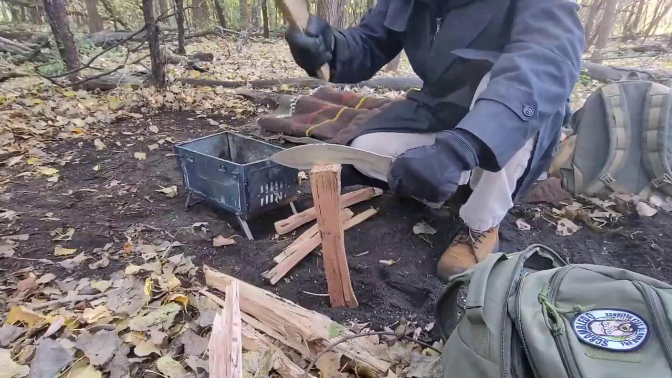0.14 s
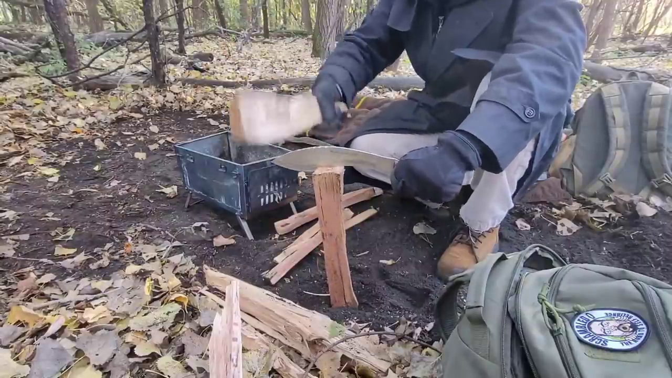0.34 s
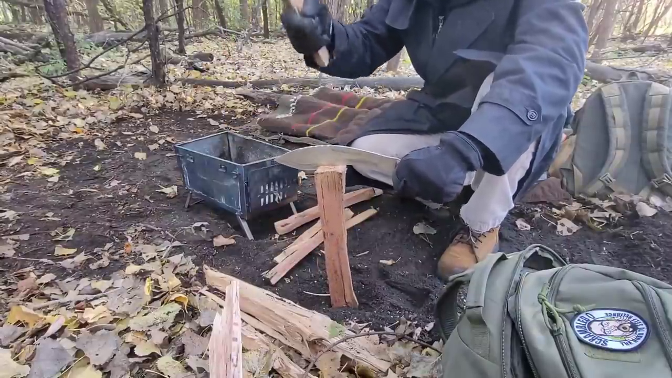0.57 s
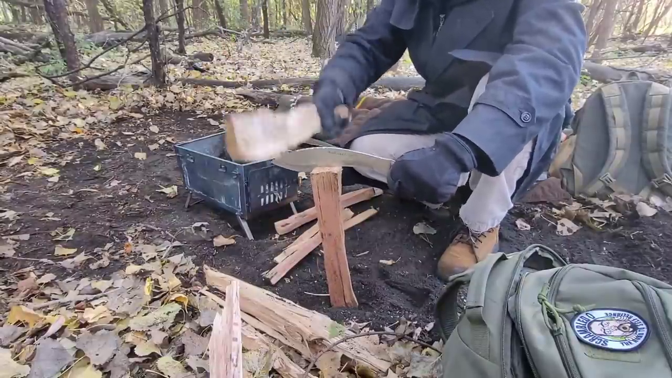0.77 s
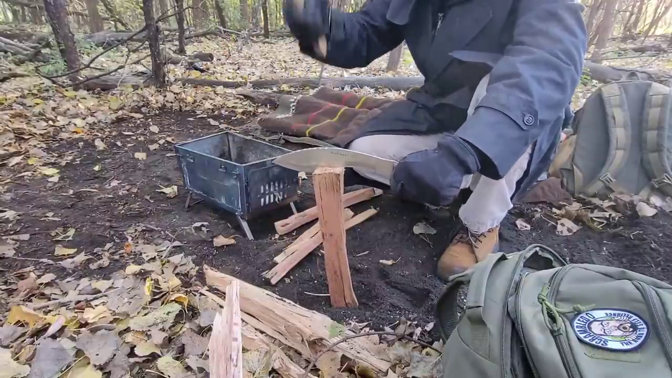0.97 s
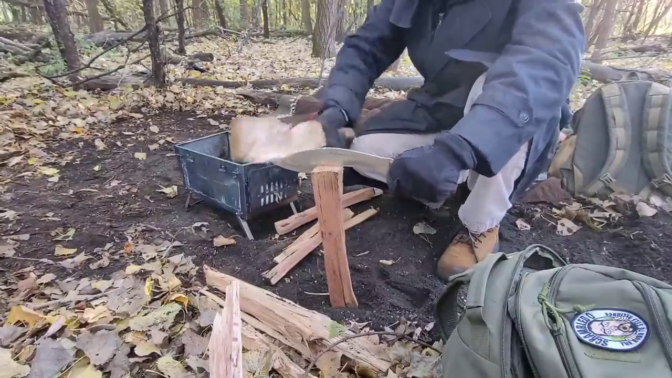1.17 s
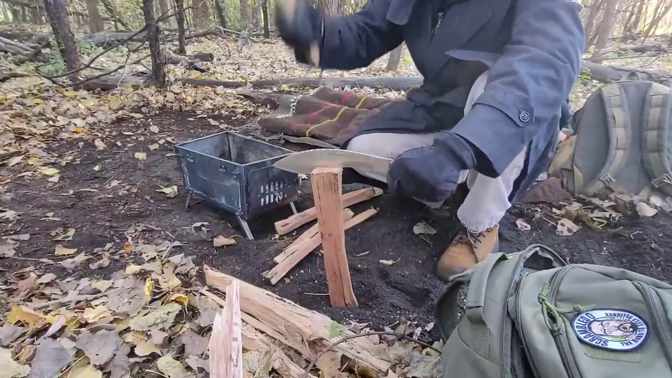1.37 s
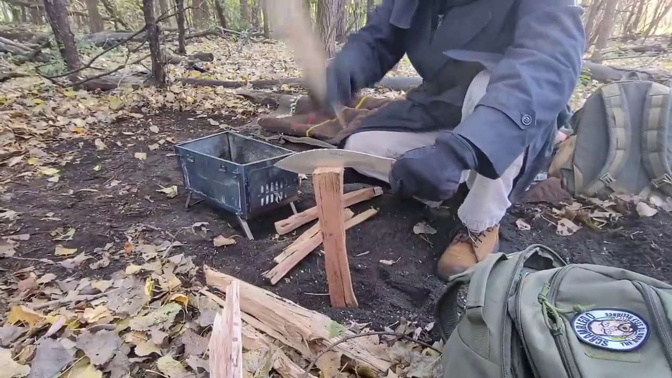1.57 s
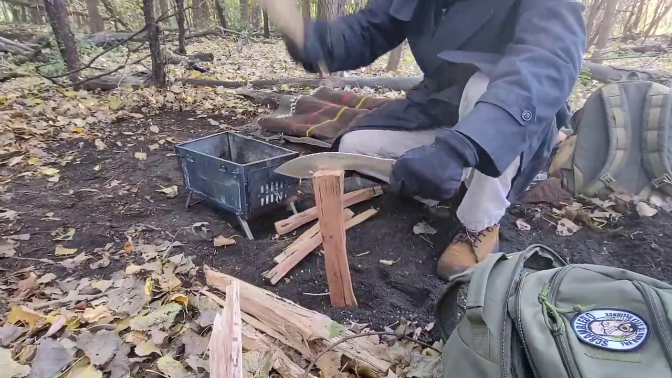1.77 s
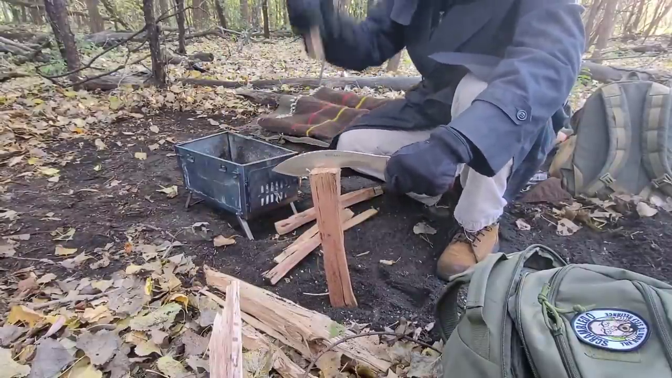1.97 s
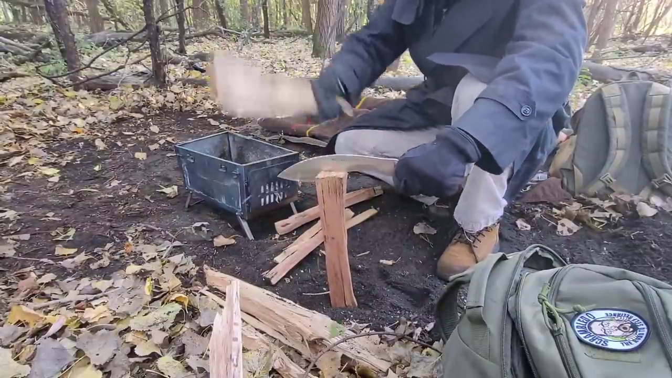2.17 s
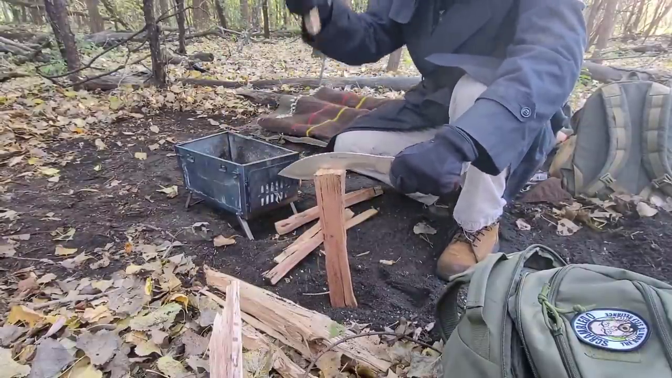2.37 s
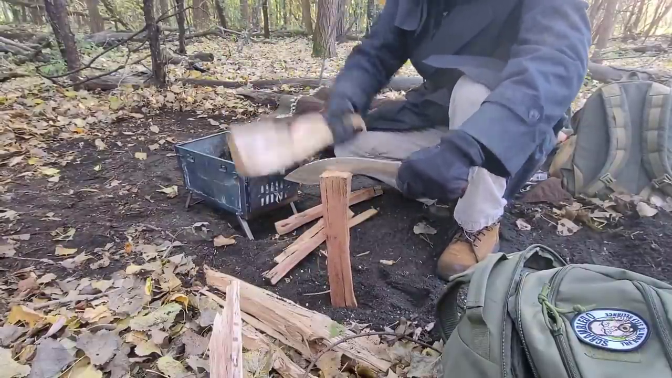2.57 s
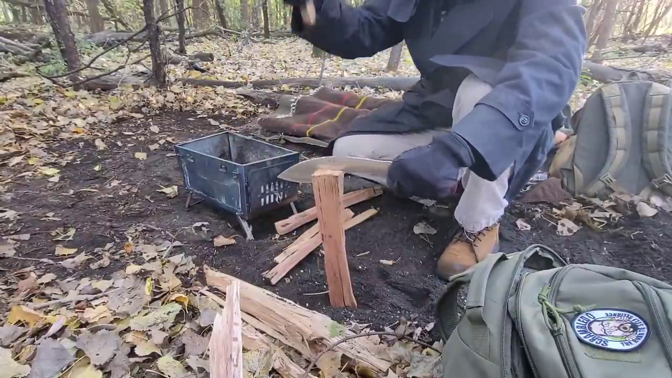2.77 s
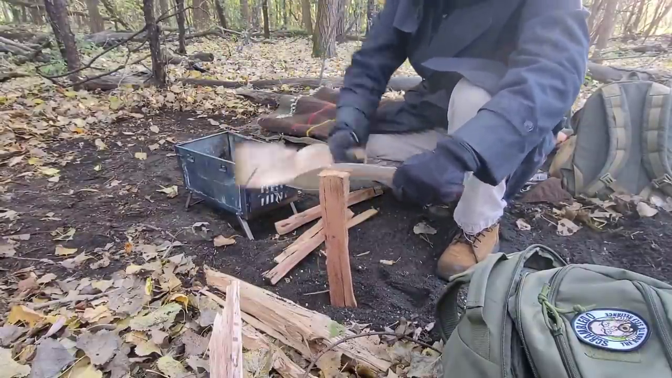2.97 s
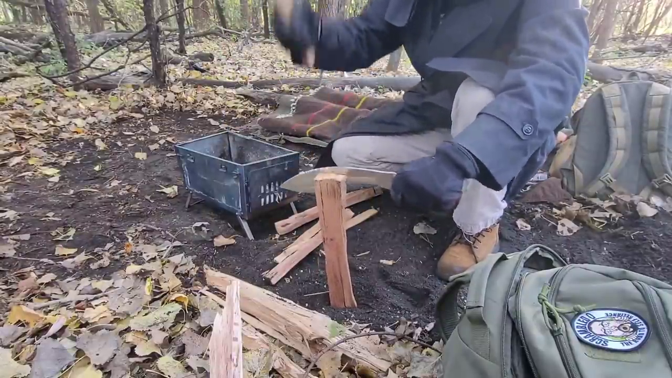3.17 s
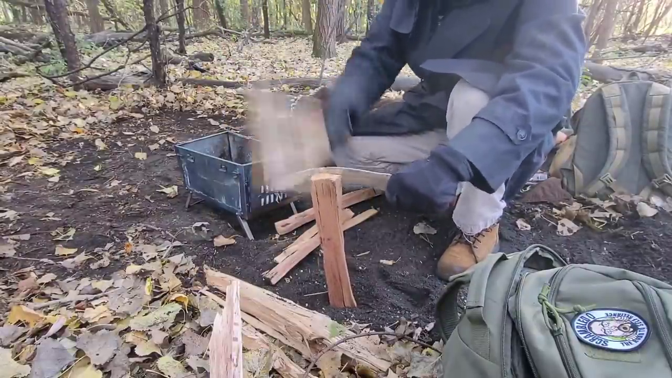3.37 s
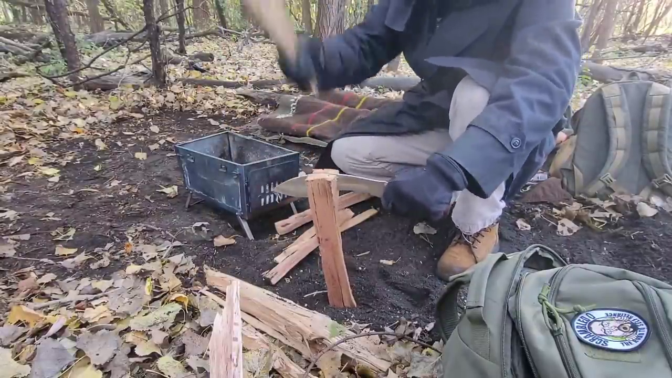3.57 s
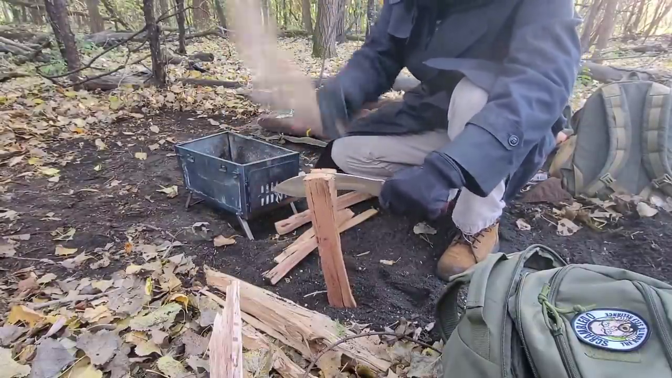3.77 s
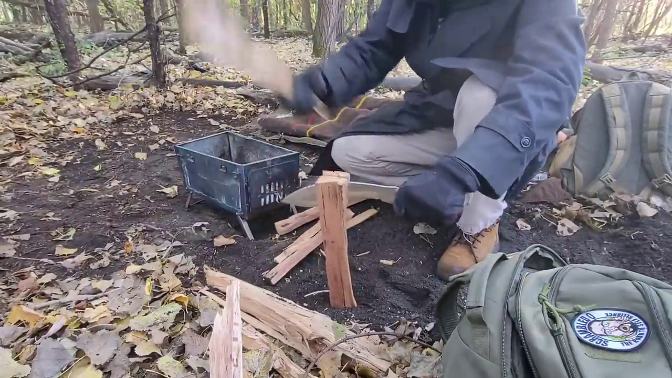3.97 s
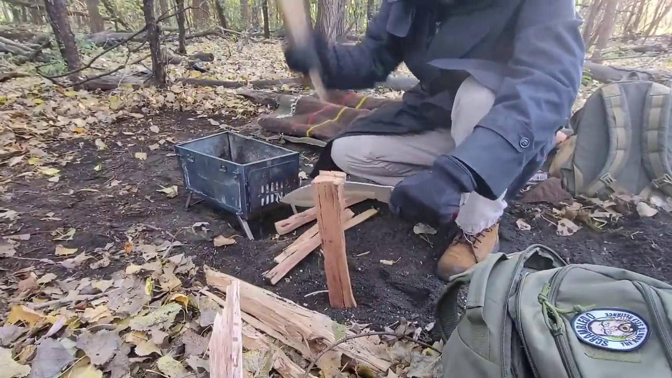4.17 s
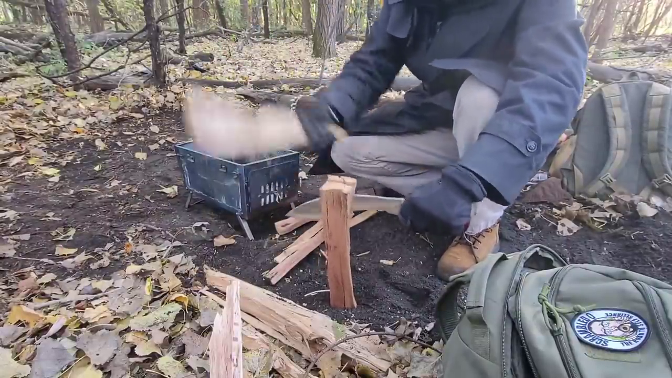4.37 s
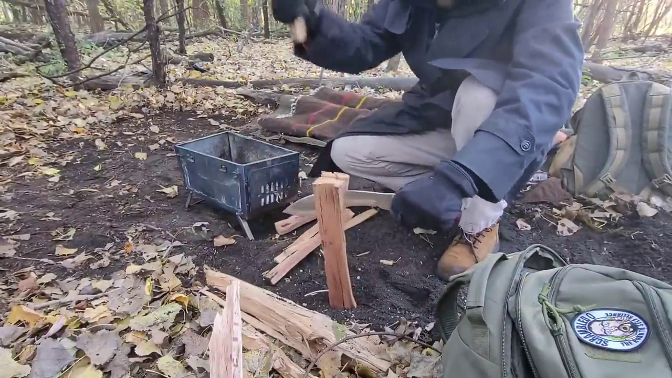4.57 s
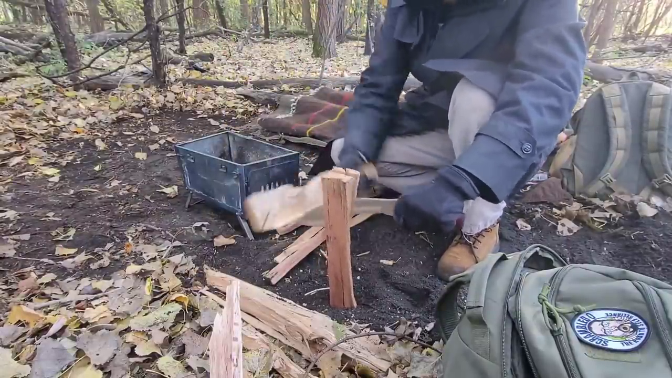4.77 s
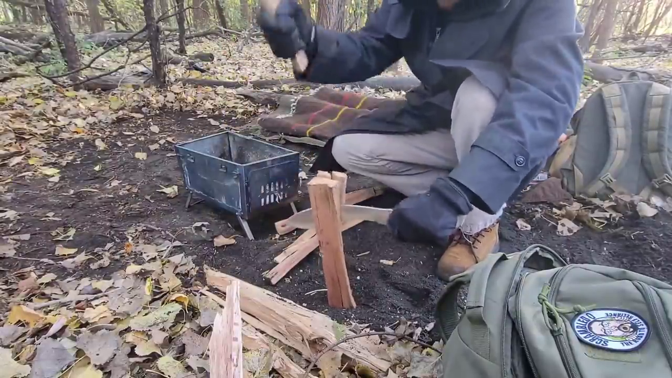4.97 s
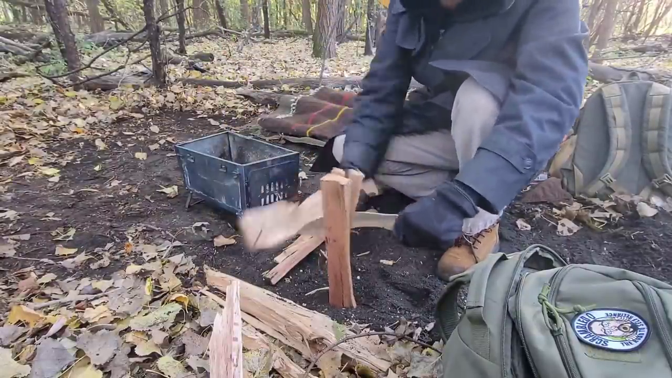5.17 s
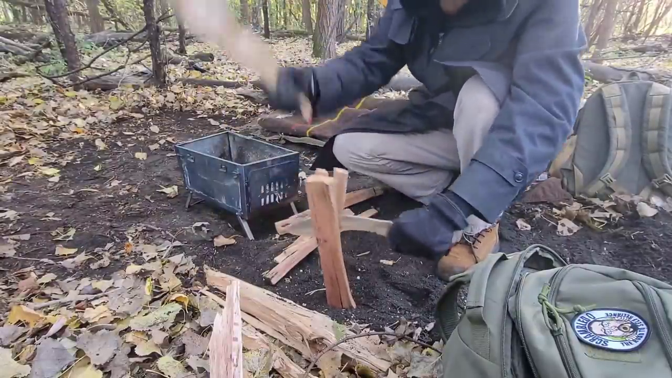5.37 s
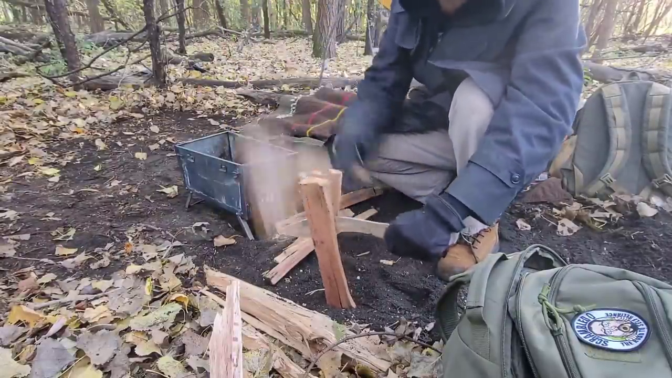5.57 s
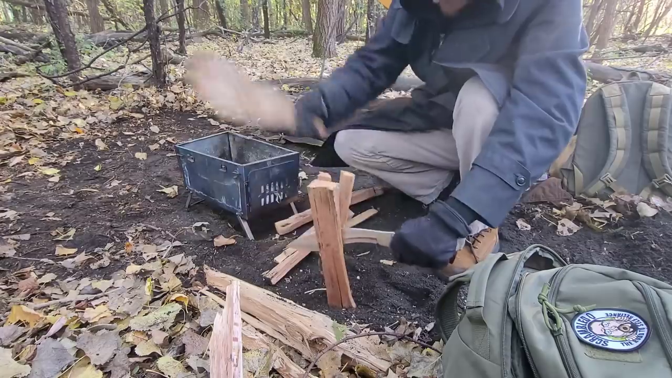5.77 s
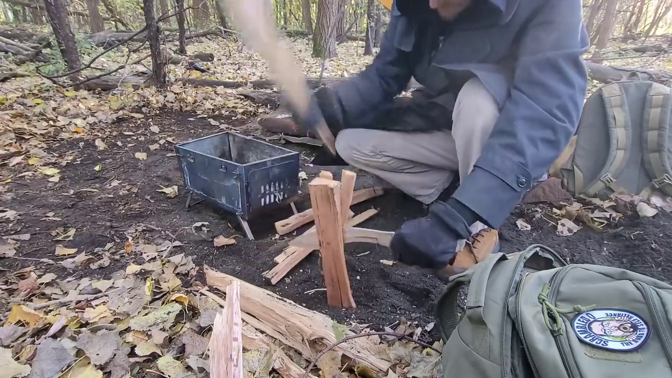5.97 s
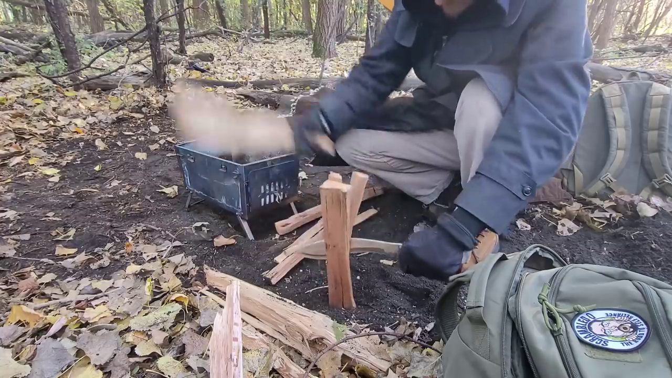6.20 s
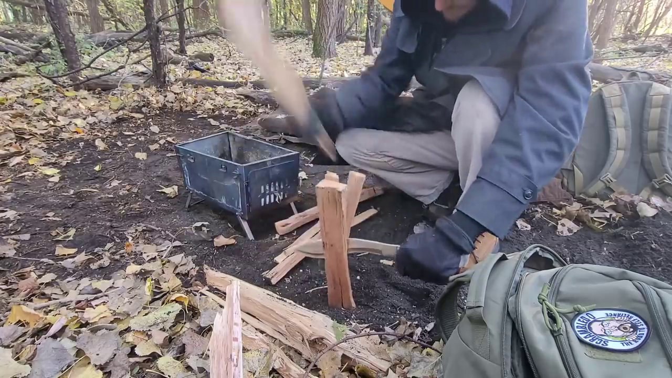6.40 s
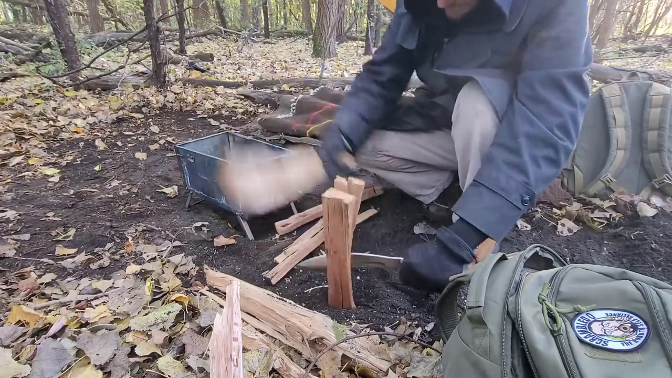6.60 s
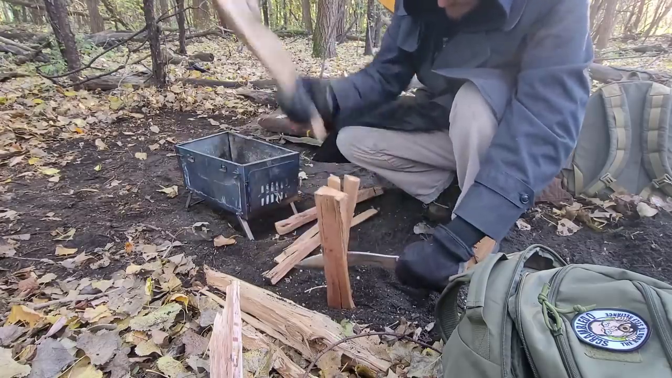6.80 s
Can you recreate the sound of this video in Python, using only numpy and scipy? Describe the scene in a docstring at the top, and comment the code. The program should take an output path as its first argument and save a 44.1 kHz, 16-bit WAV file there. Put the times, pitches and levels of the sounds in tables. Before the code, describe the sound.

Close outdoor stereo pickup in a wood: a far engine drones over a low rumble while a wooden baton strikes a knife's spine about twice a second. Each blow is a short, hard knock with a bright crack, tearing fibres and a soft ground thud. Small wood ticks fall between blows, and the knocks rise in pitch as the billet splits and the engine fades.

```python
"""A far engine drones and its faint whine is lost first, over a low rumble and the air of a wood.
From 0.4 s on, fifteen even blows of a wooden baton drive a big knife down through a billet of firewood.
Damped modes make the knocks, noise bursts the cracks, a falling sine the ground's thud; trees scatter a tail.
Between the blows short noise and modes make the wood tick, and before the seventh the handle clacks.
As the blade sinks the knocks rise in pitch, the halves ring more and the cracks brighten."""
import sys
import numpy as np
from scipy import signal
from scipy.fft import rfft, irfft, next_fast_len
from scipy.io import wavfile
from scipy.ndimage import uniform_filter1d, map_coordinates

SR = 44100
rng = np.random.default_rng(int(sys.argv[2]) if len(sys.argv) > 2 else 0)


def wrap_up_sound(samples):
    """Save the sound to the file named by the first command line argument, as 16-bit audio."""
    columns = np.atleast_2d(samples).T
    # keep every value between -1 and 1, then stretch to whole-number steps
    tamed = np.clip(columns, -1, 1)
    steps = np.round(tamed * 32767).astype(np.int16)
    wavfile.write(sys.argv[1], SR, steps)


N = 301640
NOW = np.arange(N) / SR  # time in the scene, s
T = np.arange(SR // 2) / SR  # time since a contact, s

# Background. Each row: time in seconds, level of the rumble and of the air in dB, before the gains below.
BACKGROUND_LEVELS = [(0.0, -34.5, -53.5), (0.93, -39.5, -52.5), (2.23, -38.5, -55), (3.71, -42, -56.5),
                     (6.84, -41, -56)]
RUMBLE_GAIN_DB, AIR_GAIN_DB = 1.5, 4
# Spectra of the rumble and the air. Each row: frequency in Hz, relative level in dB.
RUMBLE_SPECTRUM = [(18, -18), (30, -10), (42, -5.5), (65, 2.5), (90, -6.5), (125, -9), (180, -19.5),
                   (250, -22), (340, -33.5), (600, -68.5)]
AIR_SPECTRUM = [(150, -20.5), (280, -12), (420, -8), (640, -6.5), (800, -9), (1000, -15), (1500, -15),
                (2000, -22), (3500, -25), (7000, -32), (9500, -43.5), (15500, -39)]
# Left-right correlation of the background noise. Each row: frequency in Hz, correlation from 0 to 1.
CORRELATION = [(60, 0.89), (150, 0.91), (400, 0), (1000, 0), (3000, 0), (10000, 0)]
# The far engine. Each row: time in seconds, firing rate in Hz, about which the rate wobbles.
FIRING_RATE = [(0, 78.9), (1.0, 78.96), (1.7, 81.27), (6.84, 79.97)]
# Partials of its drone, then of its upper hum and whine. Each row: multiple of the firing rate, relative dB.
DRONE_ORDERS = [(1, 1.5), (2, -19)]
WHINE_ORDERS = [(3, 1.5), (8, 0)]
# Each holds its level, then recedes.
DRONE_DB, DRONE_HOLD_S, DRONE_FADE_DB_PER_S = -38, 2.6, 11
WHINE_DB, WHINE_HOLD_S, WHINE_FADE_DB_PER_S = -58, 1.8, 14

# Decay of the trees' tail. Each row: frequency in Hz, time to fall by 60 dB in seconds.
FOREST_T60 = [(200, 0.083), (1500, 0.38), (4000, 0.33), (8000, 0.32), (15000, 0.33)]
# Colour that the near surroundings, then the trees, lend to a sound. Each row: frequency in Hz, change in dB.
NEAR_COLOUR = [(100, -7), (300, 4), (600, -8.5), (1000, -4.5), (2000, -6), (4000, -5), (8000, -0.5),
               (15000, -1)]
FOREST_COLOUR = [(100, -4), (500, -7.5), (900, -10), (1500, -7), (3000, 2), (7000, 7), (15000, 7)]

# Ticks of the wedged wood. Each row: start in seconds, relative level in dB, centre frequency in Hz.
TICKS = [(0.6094, -47, 5000), (2.1156, -32, 6100), (2.7436, -26.5, 3580), (2.8067, -26.5, 4200),
         (2.8225, -27, 3980), (3.0248, -34, 3560), (3.3688, -39.5, 3800), (3.7398, -40.5, 6800),
         (4.018, -28.5, 6000), (4.041, -41, 6300), (4.792, -28, 3090), (5.043, -40.5, 6560),
         (5.236, -27, 3200), (5.4058, -32.5, 3440)]
# The baton's handle clacks on the blade. Each row: start in seconds, relative level in dB.
CLACKS = [(3.0607, -12.5), (3.0648, 1.5), (3.0666, -6.5)]
# Modes of a clack. Each row: frequency in Hz, relative level in dB, time to fall by 60 dB in seconds.
CLACK_MODES = [(1980, -6, 0.02), (2530, 0, 0.033), (3000, -10, 0.02), (3680, -11, 0.019),
               (4900, -7.5, 0.021), (5820, -1.5, 0.016), (6870, -13, 0.038)]

# Baton blows. Each row: start in seconds, then in dB the levels of the billet's knock, the baton's knock,
# the crack and the tearing fibres.
BLOWS = [(0.3922, -12, -9, -16.5, -20), (0.8478, -12, -10.5, -14.5, -23), (1.2971, -13, -9.5, -13, -17.5),
         (1.7476, -14, -11.5, -15, -21.5), (2.19, -15, -12, -11.5, -30), (2.6368, -14.5, -11.5, -12, -28),
         (3.0871, -16, -16, -12, -24), (3.5269, -12.5, -14.5, -14, -18.5), (3.9438, -11, -15.5, -11, -16.5),
         (4.3827, -17, -12, -12.5, -14.5), (4.8398, -18.5, -11, -11, -17),
         (5.2816, -16, -12.5, -12.5, -12.5), (5.728, -21.5, -10.5, -10, -19),
         (6.1703, -22.5, -13, -11.5, -16), (6.6055, -20, -9, -12, -21.5)]
# Modes of the parts struck. Each row: frequency in Hz before scaling, relative level in dB,
# time to fall by 60 dB in seconds.
BILLET_MODES = [(643.6, 7.5, 0.018), (565, -23.5, 0.029), (707.5, -1.5, .028), (414, -32.5, 0.01)]  # standing on soil, main mode first
BATON_MODES = [(1410, 9.5, 0.015), (1230, -9, 0.015), (1570, -11.5, 0.021), (1767, -11, 0.019)]  # on the blade's spine, main mode first
HALVES_MODES = [(966, -2.5, 0.035), (1066, 9, 0.027), (1708, -3, .02), (1912, -2.5, .022),
                (2310, -2, 0.016)]  # the billet's halves, freer as the split grows
AFTER_RING_MODES = [(747.5, -34, 0.075), (778, -39.5, 0.072), (1091, -30.5, .08)]  # the wedged blade's after-ring
STEEL_MODES = [(2034, -2, 0.028), (2464, -1.5, 0.029), (2983, -2, 0.02), (3840, 0.5, 0.025),
               (4370, -4, 0.024), (5270, -3.5, 0.02), (6864, -6, 0.027)]  # the blade's bending modes, damped by the wood that grips it
SOIL_MODES = [(258, 0, 0.039)]  # the soil's short bump under the billet
# Spectra of the crack and of breaking fibres. Each row: frequency in Hz, relative level in dB.
CRACK_SPECTRUM = [(600, -42.5), (1500, 2), (2100, 3), (2800, -0.5), (4000, -7.5), (5500, -8.5), (7300, -6),
                  (9000, -14), (12000, -16), (15500, -17)]
FIBRE_SPECTRUM = [(500, -29.5), (1200, -3), (2600, -1.5), (4000, 4.5), (5500, -3), (7300, -4.5),
                  (9000, -13.5), (12000, -9), (15500, -16.5)]
MODE_SCATTER_DB = 1.2  # spread of the mode strengths from blow to blow

# Every blow sinks the blade one step deeper; each pair is (at the first blow, at the last blow).
BILLET_HZ, BATON_HZ = (606, 730), (1307, 1458)  # main modes rise in pitch
HALVES_DB, SOIL_DB = (-29.5, -18), (-31.5, -33)
CRACK_TILT_DB = (-.4, 0.5)  # dB per octave
THUD_DB = (-12, -13.5)  # relative to the billet's knock
STEEL_DB = (-9, -5)  # the blade rings more, within the crack
STEEL_PITCH = (1.03, 1.05)  # mean ratio by which the wood's grip shifts its modes
SWELL_DB = (-13, -10)  # the short rush into the knock, relative to the blow
TOP_HZ = 15650  # band limit


def amp(db):
    """The decibel law: amplitude grows tenfold every 20 dB."""
    return 10 ** (np.asarray(db) / 20)


def unit(x):
    """Normalisation to unit mean power."""
    return x / np.sqrt(np.mean(x ** 2) + 1e-20)


def burst(x, span):
    """Normalisation of energy: x gets the energy that rms 1 has over span seconds."""
    energy = np.mean(np.sum(x ** 2, -1))
    return x / np.sqrt(energy / (span * SR) + 1e-20)


def fade(t60):
    """Exponential decay by 60 dB in t60 seconds."""
    return np.exp(-np.log(1000) * T / t60)


def along(points, hz):
    """Interpolation of (Hz, value) points on a logarithmic frequency axis."""
    f, value = np.transpose(points)
    return np.interp(np.log(hz + 1), np.log(f), value)


def curves(rows):
    """Linear interpolation in time: one value per sample for each column after the time."""
    s, *columns = np.transpose(rows)
    return [np.interp(NOW, s, column) for column in columns]


def wobble(rate):
    """Slow random modulation: a smooth curve with rate knots a second."""
    knots = rng.standard_normal(int(N * rate / SR) + 4)
    return map_coordinates(knots, [NOW * rate])


def receding(db, hold_s, fade_db_per_s):
    """Recession of a source: its level in dB holds, then falls steadily."""
    return db - fade_db_per_s * np.maximum(NOW - hold_s, 0)


def at_depth(pair, depth):
    """Linear dependence on the blade's depth, from the first value at 0 to the last at 1."""
    first, last = pair
    return first + (last - first) * depth


def filtered(x, response):
    """Linear filtering: the spectrum of x times a response of frequency."""
    m = next_fast_len(x.shape[-1] + SR // 10)
    spectrum = rfft(x, m) * response(np.fft.rfftfreq(m, 1 / SR))
    return irfft(spectrum, m)[..., :x.shape[-1]]


def coloured(x, spectrum):
    """Spectral shaping by a table of levels."""
    return filtered(x, lambda hz: amp(along(spectrum, hz)))


def brightened(x, db_per_octave):
    """Spectral tilt about 4 kHz, constant below 1.5 kHz."""
    return filtered(x, lambda hz: amp(db_per_octave * np.log2(np.maximum(hz, 1500) / 4000)))


def hiss():
    """Incoherent white noise: half a second, unrelated in the two channels."""
    return rng.standard_normal((2, len(T)))


def add(track, s, sound):
    """Superposition: a sound joins the track at s seconds."""
    i = max(round(s * SR), 0)
    track[:, i:i + sound.shape[-1]] += sound[..., :N - i]


def ring(modes, scale, attack, scatter_db, lag):
    """Modal synthesis: damped sines at new strengths, reaching the right channel lag seconds later."""
    t = np.maximum(T - np.array([[0], [lag]]), 0)
    sizes = amp(scatter_db * rng.standard_normal((len(modes), 2, 1)))
    waves = 0
    for size, (hz, db, t60) in zip(sizes, modes):
        waves = waves + size * amp(db) * fade(t60) * np.sin(2 * np.pi * hz * scale * t)
    return -waves * (1 - np.exp(-t / attack))  # the first swing is negative


def bed(spectrum):
    """Partial coherence: steady stereo noise, alike in the bass and unrelated in the treble."""
    def turn(hz):
        return np.arccos(np.clip(along(CORRELATION, hz), -1, 1)) / 2

    def mid_and_side(hz):
        return amp(along(spectrum, hz)) * [np.cos(turn(hz)), np.sin(turn(hz))]

    mid, side = filtered(rng.standard_normal((2, N)), mid_and_side)
    return unit(np.array([mid + side, mid - side]))


def far_engine():
    """Harmonic excitation: drone and whine are multiples of one unsteady firing rate, and recede."""
    firing_hz, = curves(FIRING_RATE)
    phase = 2 * np.pi * np.cumsum(firing_hz + 0.2 * wobble(8.6)) / SR
    drone = unit(sum(amp(db + 1.4 * wobble(6.4)) * np.sin(k * phase) for k, db in DRONE_ORDERS))
    whine = unit(sum(amp(db) * np.sin(k * phase) for k, db in WHINE_ORDERS))
    drone_db = receding(DRONE_DB, DRONE_HOLD_S, DRONE_FADE_DB_PER_S)
    whine_db = receding(WHINE_DB, WHINE_HOLD_S, WHINE_FADE_DB_PER_S) + 2.5 * wobble(10)
    return amp(drone_db) * drone + amp(whine_db) * whine


def background():
    """Incoherent addition of the far engine, a low rumble and the air of the wood."""
    rumble_db, air_db = curves(BACKGROUND_LEVELS)
    rumble = amp(RUMBLE_GAIN_DB + rumble_db + 0.66 * wobble(5.7)) * bed(RUMBLE_SPECTRUM)
    air = amp(AIR_GAIN_DB + air_db + 0.54 * wobble(3.0)) * bed(AIR_SPECTRUM)
    return far_engine() + rumble + air


def scatter(x, paths, spectrum):
    """Multipath scattering: over many weak paths only the broad colour of x survives."""
    power = np.mean(np.abs(rfft(x)) ** 2, 0)
    grid = np.fft.rfftfreq(len(T), 1 / SR)
    treble = np.clip((grid - 1800) / 1500, 0, 1)
    # short waves beam more unevenly, so their colour blurs over a wider band
    narrow_blur = uniform_filter1d(power, size=120)
    wide_blur = uniform_filter1d(power, size=260)
    broad = np.sqrt(np.abs((1 - treble) * narrow_blur + treble * wide_blur))

    def colour(hz):
        return np.interp(hz, grid, broad) * amp(along(spectrum, hz))

    return filtered(burst(paths, span=1 / SR), colour)


def forest(x, near_db, far_db, echo_db):
    """Reverberation: ground and kit answer first, one trunk a little later, the wood in a soft tail."""
    arrival = 1 - np.exp(-(T / 0.0073) ** 2)
    near = scatter(x, hiss() * fade(0.067) * arrival, NEAR_COLOUR)
    trunk = hiss() * np.exp(-((T - .058) / 0.005) ** 2)
    echo = scatter(x, trunk, [(300, -21), (700, -9), (1400, -6.5), (3000, -7.5), (9000, -14)])
    # each band of the tail decays at its own rate
    hz, t, bands = signal.stft(hiss(), SR, nperseg=256)
    decay = np.exp(-np.log(1000) * t / along(FOREST_T60, hz)[:, None])
    tail = signal.istft(bands * decay, SR, nperseg=256)[1][:, :len(T)]
    far = scatter(x, tail * arrival, FOREST_COLOUR)
    return x + amp(near_db) * near + amp(far_db) * far + amp(echo_db) * echo


def wood_ticks():
    """Release of strain: the wedged billet ticks with a dry snap and three short splinter modes."""
    track = np.zeros((2, N))
    splinter_modes = [(.7, -2, .02), (1, 2, 0.018), (1.6, -3.5, .014)]  # multiple of centre, dB, t60 s
    for s, db, hz in TICKS:
        colour = [(hz / 4, -21), (hz / 2, -4), (hz, 0), (hz * 2, -5), (hz * 4, -11)]
        snap = unit(coloured(hiss(), colour)) * fade(0.013)
        splinter = ring(splinter_modes, hz, attack=.0001, scatter_db=1.5, lag=.00003)
        tick = amp(db - 4.5) * (snap + amp(-8) * splinter)
        add(track, s, forest(tick, near_db=-7.0, far_db=-24.5, echo_db=-42.5))
    return track


def handle_clacks():
    """Impact on a narrow radiator: the handle clacks brightly on the blade, with little bass."""
    track = np.zeros((2, N))
    for s, db in CLACKS:
        tone = ring(CLACK_MODES, 1, attack=.0001, scatter_db=3.5, lag=.00002)
        noise = unit(coloured(hiss(), FIBRE_SPECTRUM)) * fade(0.015)
        clack = amp(-12.5) * tone + amp(-13.5) * noise
        thin = coloured(clack, [(300, -26), (1200, -29), (1900, -0.5), (15000, -1.5)])
        add(track, s, forest(amp(db) * thin, near_db=-15, far_db=-23.5, echo_db=-39))
    return track


def swell(x, rise, swell_db):
    """Time-reversed decay: a short rush of the knock's colour grows into it and blunts its edge."""
    colour = [(200, 8.0), (600, 0.5), (1300, -7.5), (3000, -1), (7000, 2.5), (14000, 1.5)]
    rush = scatter(x, hiss() * fade(rise), colour)
    return amp(swell_db) * rush[:, ::-1]


def thud(rest_hz, bend_hz, t60, delay):
    """Nonlinear stiffness: soil rammed by the billet is stiff at first, then bounces slowly."""
    t = np.maximum(T - delay, 0)
    pitch_hz = rest_hz + bend_hz * np.exp(-t / 0.0068)
    phase = 2 * np.pi * np.cumsum(pitch_hz * (t > 0)) / SR
    bounce = -np.sin(phase) * fade(t60) * (1 - np.exp(-t / 0.0022))
    return burst(bounce, span=0.034)


def crack(crack_db, tear_db, steel_db, steel_pitch):
    """Fracture: the contact snaps and jars the steel, then fibres tear in a volley of tiny breaks."""
    snap = coloured(hiss(), CRACK_SPECTRUM) * fade(0.022) * (1 - np.exp(-T / 0.00022))
    pitch = steel_pitch + 0.03 * rng.standard_normal()
    steel = ring(STEEL_MODES, pitch, attack=0.00047, scatter_db=5.0, lag=.00004)
    contact = amp(-1.0) * burst(snap, span=0.0052) + amp(steel_db) * burst(steel, span=0.0033)
    breaks = (rng.random(len(T)) < .04) * rng.exponential(size=len(T))
    fibres = signal.fftconvolve(breaks[None], hiss() * fade(0.0028), axes=1)[:, :len(T)]
    volley = coloured(fibres, FIBRE_SPECTRUM) * np.exp(-((T - .0058) / 0.0023) ** 2)
    return amp(crack_db) * contact + amp(tear_db) * burst(volley, span=0.0033)


def knock(billet_db, billet_hz, baton_db, baton_hz, halves_db, soil_db):
    """Modal excitation by impact: wood, blade and soil ring briefly, each in its own damped modes."""
    billet_scale = billet_hz / BILLET_MODES[0][0]
    baton_scale = baton_hz / BATON_MODES[0][0]
    billet = ring(BILLET_MODES, billet_scale, attack=0.0011, scatter_db=MODE_SCATTER_DB, lag=0.00015)
    baton = ring(BATON_MODES, baton_scale, attack=0.00068, scatter_db=MODE_SCATTER_DB, lag=0.00015)
    halves = ring(HALVES_MODES, 0.93, attack=0.0019, scatter_db=MODE_SCATTER_DB, lag=0.00018)
    # the blade outlasts the wood
    blade = ring(AFTER_RING_MODES, 0.94, attack=0.0054, scatter_db=MODE_SCATTER_DB, lag=.0001)
    soil = ring(SOIL_MODES, 0.99, attack=0.00086, scatter_db=MODE_SCATTER_DB, lag=0.00034)
    # the pairs are left and right gains in dB
    billet = amp(billet_db) * burst(billet, span=0.0092) * amp([[-.1], [.1]])
    baton = amp(baton_db) * burst(baton, span=0.0089) * amp([[1.1], [-1.1]])
    halves = amp(halves_db) * burst(halves, span=0.015)
    soil = amp(soil_db) * burst(soil, span=.016) * amp([[-1.2], [1.2]])
    return billet + baton + halves + blade + soil


def batoning():
    """Superposition at every blow of swell, knock, crack, thud and reverberation, set by the blade's depth."""
    track = np.zeros((2, N))
    depths = np.linspace(0, 1, len(BLOWS))
    for depth, (s, billet_db, baton_db, crack_db, tear_db) in zip(depths, BLOWS):
        wood = knock(billet_db, at_depth(BILLET_HZ, depth), baton_db, at_depth(BATON_HZ, depth),
                     at_depth(HALVES_DB, depth), at_depth(SOIL_DB, depth))
        snap = crack(crack_db, tear_db, at_depth(STEEL_DB, depth), at_depth(STEEL_PITCH, depth))
        blow = wood + brightened(snap, at_depth(CRACK_TILT_DB, depth))
        add(track, s, forest(blow, near_db=-10.0, far_db=-22.0, echo_db=-34))
        thud_db = billet_db + at_depth(THUD_DB, depth)
        add(track, s, amp(thud_db) * thud(rest_hz=42, bend_hz=76, t60=0.12, delay=.0132))
        # the last tenth of a second of the rush ends where the blow starts
        lead = swell(blow, rise=0.046, swell_db=at_depth(SWELL_DB, depth))[:, -SR // 10:]
        add(track, s - lead.shape[-1] / SR, lead)
    return track


def scene():
    """Linear superposition of the background, the small contacts and the blows."""
    return background() + wood_ticks() + handle_clacks() + batoning()


def record(dry):
    """Saturation and band limiting: the loudest peaks flatten, and a steep low-pass follows."""
    flattened = dry / (1 + np.abs(dry) ** 6) ** (1 / 6)
    return filtered(flattened, lambda hz: 1 / np.sqrt(1 + (hz / TOP_HZ) ** 200))


dry = scene()
out = record(dry)
wrap_up_sound(out)
```